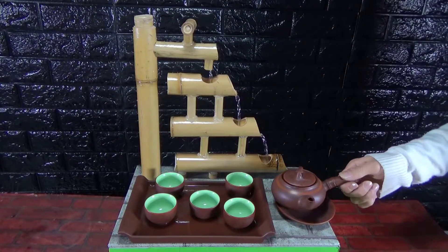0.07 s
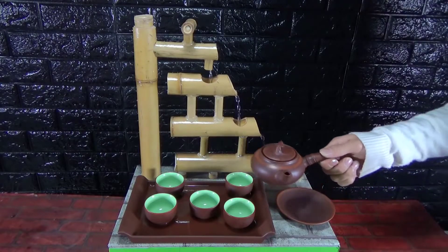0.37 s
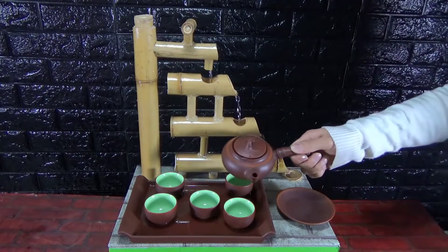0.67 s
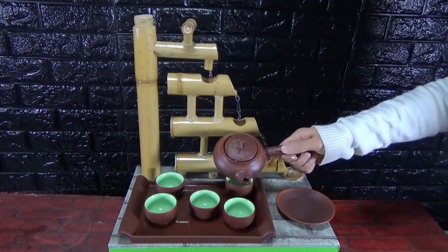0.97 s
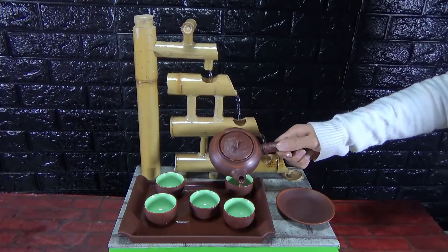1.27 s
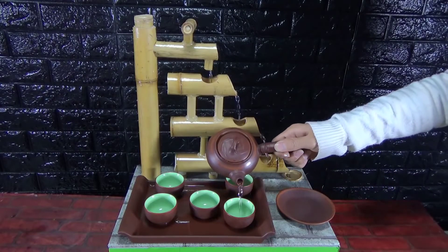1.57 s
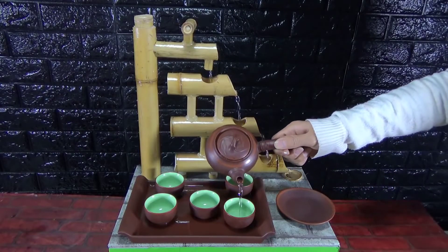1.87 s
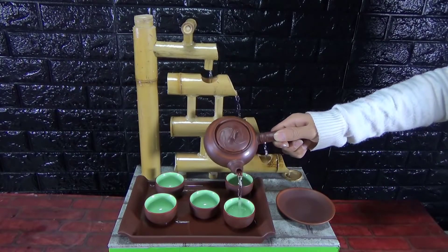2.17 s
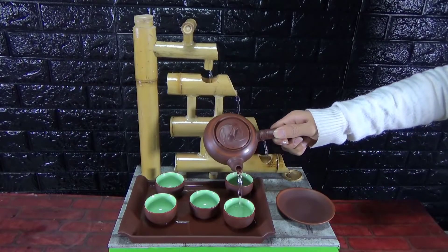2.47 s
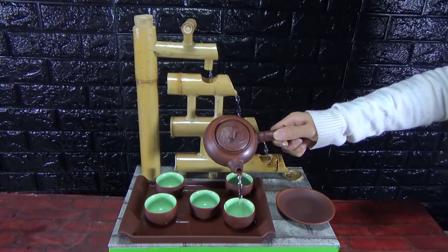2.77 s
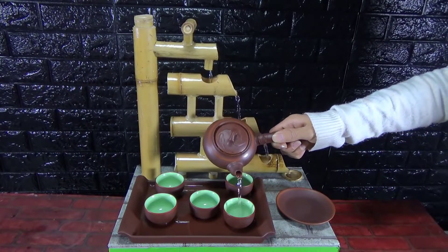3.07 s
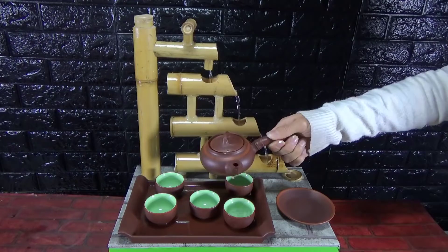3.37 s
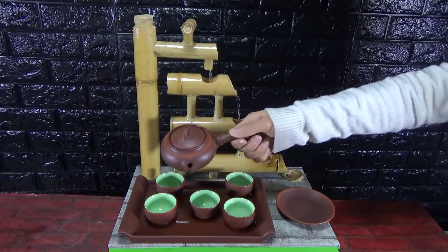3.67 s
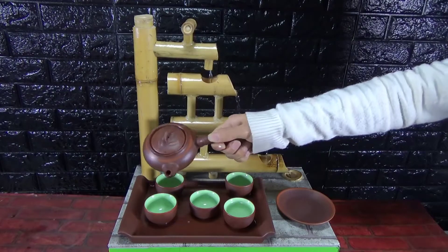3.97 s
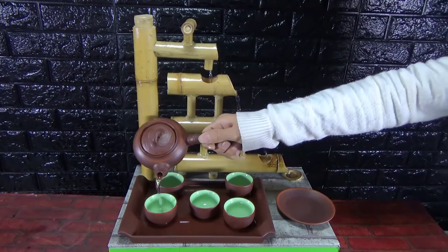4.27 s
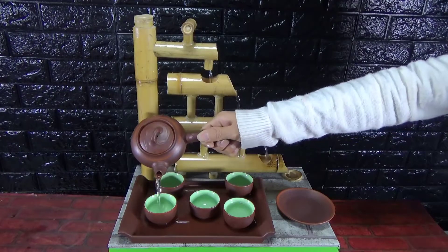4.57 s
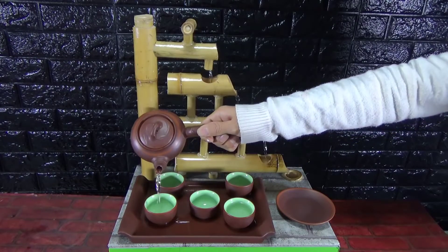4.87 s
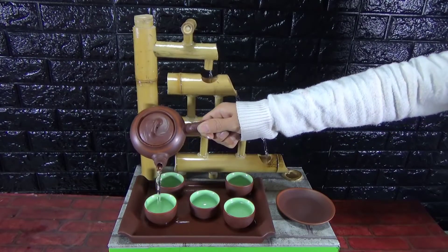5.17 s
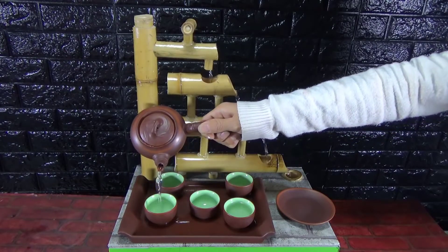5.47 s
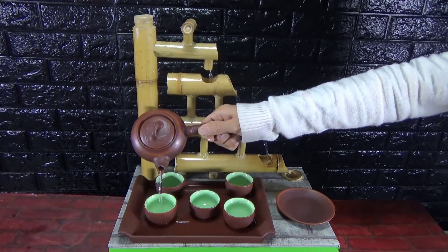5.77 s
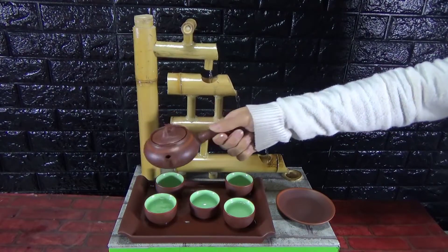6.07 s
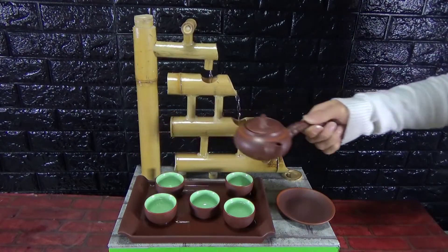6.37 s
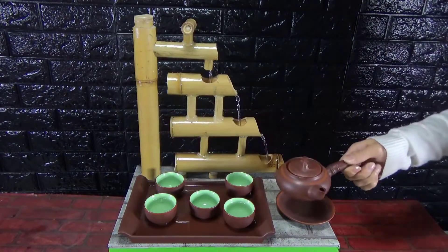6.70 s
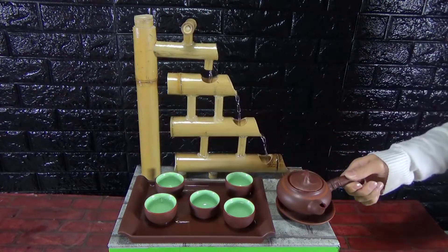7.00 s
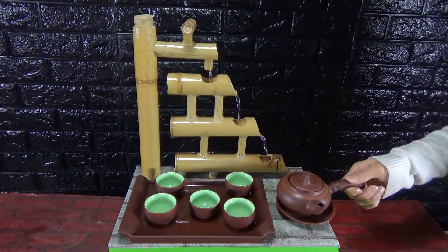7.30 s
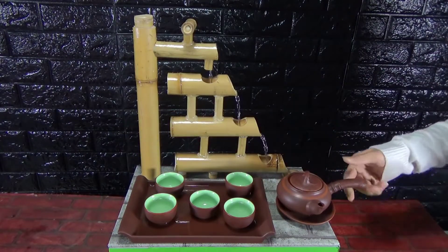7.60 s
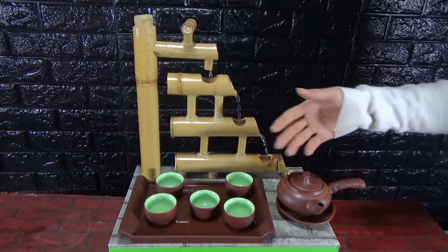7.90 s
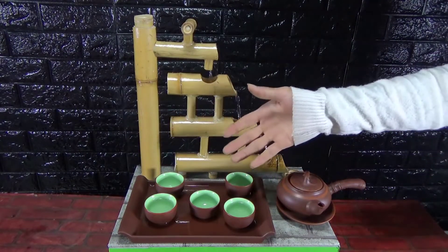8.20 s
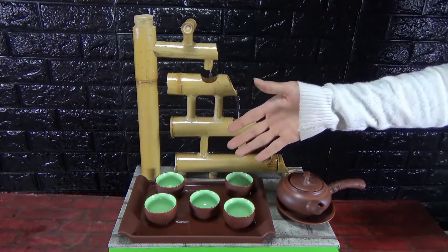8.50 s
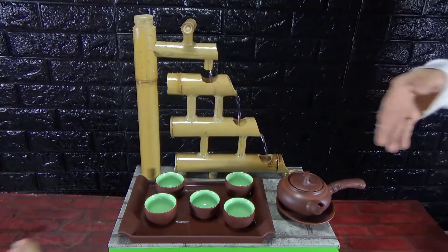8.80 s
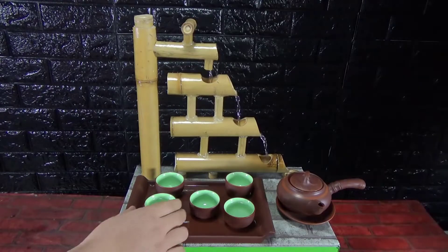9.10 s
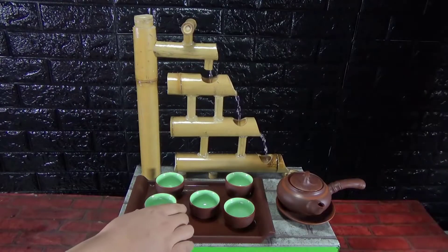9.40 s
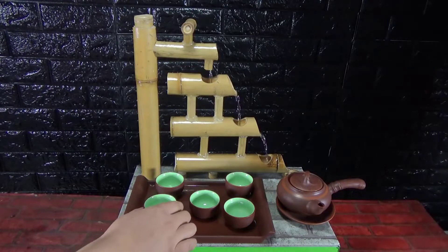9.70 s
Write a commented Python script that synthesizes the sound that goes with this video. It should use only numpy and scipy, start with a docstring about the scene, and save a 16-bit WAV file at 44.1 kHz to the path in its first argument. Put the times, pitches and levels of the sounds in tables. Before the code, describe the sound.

From the first moment to the end, about 10 seconds, a small bamboo fountain trickles close to the microphone in a quiet room. Drops fall in a quick, uneven patter. Some plink into shallow pools with short, bubbly notes that mostly rise in pitch, while others land on wet bamboo with crisp, high ticks. A few stand out slightly, for example at around 1.2 and 7.9 seconds, but the flow never swells or stops. Fine spray, a soft burble and a very faint hiss fill the tiny gaps between drops. The water sits near the centre, a little to the right, and the room adds a slight, short echo. Well below the water, an electric motor hums steadily with a quick throb, blending with faint low room noise.

```python
"""A small bamboo fountain trickles on a table in a quiet room, close to the microphone.
Water falls from spout to spout: big drops plink in the pools, each trapping a bubble that rings and
mostly rises in pitch. Others tick on the wet bamboo, and fine spray and soft burble fill the pauses.
The bamboo and the room throw the drops back, and an electric motor hums below with a quick throb."""
import sys
import numpy as np
from scipy import signal
from scipy.fft import rfft, irfft
from scipy.io import wavfile

SR = 44100
rng = np.random.default_rng(int(sys.argv[2]) if len(sys.argv) > 2 else 0)


def waveform_to_disk(signal):
    """Save audio, clipped to [-1, 1], as 16-bit WAV at the path in sys.argv[1]."""
    frames = np.transpose(np.atleast_2d(signal))
    scaled = np.clip(frames, -1, 1) * 32767
    samples = np.round(scaled).astype(np.int16)
    wavfile.write(sys.argv[1], SR, samples)


N = 434385
IMPACT_LEAD_S = 0.0005   # a drop strikes just before its bubble pinches off


# Drops plunging into the pools, close to the microphone. Each row: start in seconds, pitch in Hz,
# relative level in dB, ring length in cycles, glide as a pitch ratio (below 1 it falls).
POOL_DROPS = [(0.046, 2770, -29.5, 3.8, 0.92), (0.047, 877, -43.5, 5, 1.5), (0.057, 3660, -20.5, 0.91, 1.1),
              (0.065, 4130, -35, 5, 1.2), (0.138, 1164, -30.5, 4, 1.2), (0.236, 2040, -22, 4.1, 0.85),
              (0.246, 3100, -23.5, 2.5, 1.1), (0.283, 2570, -27.5, 3.1, 1), (0.372, 4430, -28, 7.3, 1.2),
              (0.454, 1300, -28.5, 9.3, 2), (0.471, 4970, -20.5, 15, 0.9), (0.516, 1350, -34.5, 7.5, 2),
              (0.565, 5200, -22, 8.5, 1.6), (0.683, 3130, -28, 13, 1.6), (0.706, 3500, -27, 3.6, 1.1),
              (0.719, 1440, -36.5, 4.5, 1.7), (0.75, 3700, -32, 6.1, 0.96), (0.776, 2370, -25.5, 2.1, 3.3),
              (0.804, 2900, -28.5, 11, 0.88), (0.837, 3100, -24.5, 10, 0.74),
              (1.005, 1650, -27.5, 3.9, 1.9), (1.032, 2270, -30, 11, 3.3), (1.05, 2680, -20.5, 1.2, 0.67),
              (1.108, 3320, -23.5, 12, 3), (1.209, 2055, -21, 12, 0.87), (1.2465, 2520, -16, 11, 1.1),
              (1.269, 2780, -29, 5.4, 1.4), (1.39, 2050, -30.5, 2.8, 0.86), (1.539, 1440, -29, 4.6, 1.8),
              (1.557, 2540, -28, 5, 2.9), (1.612, 2070, -26.5, 21, 4), (1.629, 3600, -24.5, 3.1, 1),
              (1.652, 2170, -22.5, 4.1, 0.92), (1.66, 1590, -30.5, 2.4, 1), (1.705, 2110, -31.5, 8.3, 2.2),
              (1.809, 3430, -29, 3.6, 1), (1.931, 1220, -26.5, 3.3, 1.1), (1.972, 3200, -32, 4.5, 1.3),
              (1.999, 3230, -24.5, 1.7, 0.81), (2.033, 2880, -27, 3.5, 1), (2.053, 1350, -26, 5.9, 3.1),
              (2.11, 2600, -27, 3.8, 0.76), (2.117, 2140, -29, 7.5, 2.3), (2.232, 2330, -34.5, 6, 1.9),
              (2.301, 2920, -23, 9.3, 1.8), (2.333, 3330, -36, 9, 2), (2.395, 980, -43.5, 7.6, 1.7),
              (2.411, 1640, -24.5, 6.4, 2.8), (2.411, 2350, -27, 8.2, 2), (2.445, 3420, -27.5, 5.5, 0.99),
              (2.507, 2700, -28.5, 3.8, 0.85), (2.595, 1990, -30, 4.8, 1.1), (2.691, 3170, -28, 4.5, 1),
              (2.7, 2560, -20, 1.7, 0.93), (2.727, 3270, -24.5, 6.2, 3.5), (2.736, 2690, -28, 15, 1.1),
              (2.793, 3520, -26, 12, 0.59), (2.793, 4080, -18.5, 1.9, 1.2), (2.834, 1440, -33, 2.2, 1),
              (2.842, 3550, -24, 2.6, 2.2), (3.019, 3360, -23, 8.6, 0.76), (3.022, 1950, -35, 8.6, 1.1),
              (3.055, 3650, -31, 4.5, 0.98), (3.1, 3440, -29, 4, 1.3), (3.233, 2770, -32.5, 12, 1.8),
              (3.263, 2080, -20.5, 11, 1.7), (3.28, 2420, -29, 7.6, 2.1), (3.377, 3760, -25.5, 3.5, 0.67),
              (3.421, 1960, -31, 2.8, 1), (3.425, 3750, -32, 6, 1.2), (3.439, 4220, -20, 2.1, 1),
              (3.44, 3440, -28, 10, 1), (3.458, 4360, -25, 8.4, 0.86), (3.471, 2090, -28, 9.7, 2.3),
              (3.472, 1250, -40, 8.6, 1.3), (3.513, 2760, -27, 5.6, 1.8), (3.609, 2290, -23, 1.4, 0.62),
              (3.621, 1580, -35.5, 11, 1.2), (3.664, 2160, -29, 2.6, 0.72), (3.67, 4370, -23.5, 12, 1.3),
              (3.732, 2450, -19.5, 0.99, 0.65), (3.832, 4600, -26, 3.5, 1.3), (3.848, 3940, -25, 3.7, 1.1),
              (3.861, 4380, -27, 8.2, 2.1), (3.864, 5000, -21, 14, 1.4), (3.918, 3120, -25, 7.9, 1.8),
              (3.988, 3050, -33.5, 26, 1.1), (4.021, 1464, -31.5, 8.6, 0.73), (4.029, 2920, -32, 4.5, 1.5),
              (4.039, 1500, -34.5, 8.6, 3), (4.123, 1510, -33.5, 3, 1), (4.163, 2680, -28, 9.4, 1.9),
              (4.187, 2680, -33.5, 16, 1.1), (4.19, 1860, -34, 8.9, 2.3), (4.235, 2260, -30.5, 6.9, 1.6),
              (4.262, 830, -40, 6.4, 2.1), (4.319, 1830, -26, 4.2, 1), (4.376, 2800, -29.5, 15, 2.7),
              (4.405, 3100, -28, 10, 1.9), (4.416, 2040, -32.5, 11, 1.7), (4.429, 4330, -22.5, 2, 1.3),
              (4.533, 4570, -20.5, 5, 0.88), (4.544, 2340, -34.5, 9, 1.1), (4.564, 3190, -26.0, 6.1, 0.68),
              (4.571, 1760, -21, 3.5, 1.2), (4.607, 3740, -24, 4.3, 2.7), (4.635, 740, -40.5, 2.3, 0.81),
              (4.649, 3700, -33, 17, 1), (4.709, 1510, -28.5, 4.5, 1), (4.759, 2120, -28, 11, 0.91),
              (4.764, 3950, -21, 1.6, 1.1), (4.801, 1260, -32.0, 6, 3), (4.885, 2570, -32.5, 21, 1.7),
              (5.019, 2250, -19, 9.4, 1.35), (5.019, 4440, -32, 2.4, 1), (5.084, 2900, -31.5, 21, 2),
              (5.084, 3600, -23, 1.4, 0.72), (5.102, 4300, -26.5, 4.1, 1.6), (5.155, 2700, -30.5, 14, 2.1),
              (5.193, 2490, -25.5, 2, 1.1), (5.222, 2270, -26.5, 4.3, 0.74), (5.222, 4210, -19.5, 1.6, 1.2),
              (5.254, 3650, -29, 2.9, 1.1), (5.392, 2000, -33, 17, 1.2), (5.399, 3550, -34, 4.4, 0.9),
              (5.415, 2470, -20, 1.5, 0.59), (5.458, 3610, -25, 7, 1.3), (5.553, 2630, -28, 12, 1),
              (5.565, 2640, -28.5, 9, 2.1), (5.627, 2430, -30, 3.9, 0.99), (5.658, 2150, -28.5, 16, 1),
              (5.675, 2870, -21, 10.5, 1.7), (5.746, 2100, -30, 7.7, 1.2), (5.756, 3720, -25, 1.6, 1.7),
              (5.831, 4700, -22, 16, 1.5), (5.841, 2630, -27, 2.3, 0.65), (5.977, 2860, -30.5, 6.4, 1.3),
              (5.98, 2070, -34, 5.1, 1), (6.114, 2500, -37, 5, 1.3), (6.132, 2900, -26.5, 11, 1.4),
              (6.173, 4000, -24.5, 3.2, 1.6), (6.197, 2500, -27.5, 8.2, 2), (6.228, 2680, -29, 2.2, 1.2),
              (6.276, 1410, -39, 5.2, 1.1), (6.355, 2020, -37, 16, 1), (6.409, 2920, -31, 4.9, 1.6),
              (6.458, 2310, -27.5, 9.5, 3), (6.474, 1570, -27, 4.8, 0.7), (6.554, 4480, -29, 6.4, 0.94),
              (6.589, 1910, -30.5, 7.5, 0.88), (6.597, 3090, -30.5, 12, 1.5),
              (6.609, 1130, -33.5, 8.6, 2.8), (6.61, 2260, -25, 1.1, 1), (6.637, 2860, -26, 5.4, 1.1),
              (6.638, 1570, -25.5, 2.5, 2.7), (6.661, 2140, -27, 9.6, 0.92)]

def plinks(level_db=2.27):
    """Drops into the pools: a bright click, then a big trapped bubble that rings and glides."""
    rows = with_repeat(POOL_DROPS)
    return from_db(level_db) * drops(rows, impact_db=-2, splash_db=-5.5, splash_s=0.0021, low_hz=2200)


# Drops landing on the wet bamboo, just as close.
# Each row: start in seconds, relative level in dB, pitch in Hz.
BAMBOO_DROPS = [(0.023, -19, 10000), (0.063, -27, 9800), (0.098, -9.5, 8300), (0.115, -18.5, 9300),
                (0.172, -20, 9050), (0.211, -20, 5340), (0.255, -19, 8400), (0.363, -17.5, 9200),
                (0.382, -10.5, 8100), (0.394, -15.5, 11000), (0.463, -23, 7500), (0.471, -18, 9000),
                (0.481, -20.0, 11000), (0.515, -16, 5170), (0.591, -17.5, 6450), (0.727, -15, 8900),
                (0.737, -17.5, 9500), (0.758, -22, 9300), (0.777, -13.5, 8200), (0.803, -16, 9000),
                (0.825, -19, 11700), (0.837, -21, 5900), (0.851, -17, 8200), (0.932, -15, 8650),
                (0.941, -24, 8700), (0.963, -16.5, 5340), (1.021, -20.5, 5800), (1.046, -12.5, 8840),
                (1.05, -23, 6760), (1.063, -24, 9000), (1.107, -18, 8260), (1.178, -15.5, 5500),
                (1.193, -17.5, 9000), (1.209, -23, 5860), (1.229, -14, 5300), (1.234, -26, 5800),
                (1.26, -20, 12800), (1.272, -22, 6900), (1.318, -7, 7830), (1.327, -20, 5600),
                (1.333, -22.0, 9600), (1.364, -13.5, 10600), (1.382, -21.5, 5300), (1.439, -13, 5740),
                (1.525, -19, 7500), (1.557, -22, 10100), (1.601, -21, 6330), (1.626, -13.5, 9200),
                (1.63, -13, 8300), (1.661, -25, 10800), (1.682, -22, 8960), (1.71, -19.5, 9050),
                (1.752, -18.5, 8950), (1.773, -21, 7900), (1.802, -18.5, 8900), (1.81, -19.5, 5140),
                (1.863, -29, 5860), (1.934, -13, 6660), (1.946, -16, 5560), (1.958, -17.5, 10300),
                (2.033, -14.5, 12600), (2.086, -18, 4700), (2.174, -15.5, 11700), (2.179, -14.5, 7000),
                (2.273, -21, 9200), (2.301, -24, 9200), (2.343, -20, 8500), (2.369, -27, 8400),
                (2.39, -12.5, 8900), (2.492, -23.5, 8800), (2.53, -13.5, 5840), (2.545, -15.5, 9600),
                (2.573, -21.5, 9000), (2.587, -17.5, 5900), (2.613, -20.0, 11200), (2.631, -24, 8800),
                (2.646, -20.5, 9200), (2.701, -16.5, 8260), (2.743, -17, 8600), (2.87, -10, 8830),
                (2.989, -13.5, 6500), (2.996, -17.5, 10700), (3.06, -18.5, 6300), (3.143, -18.0, 8500),
                (3.152, -18.5, 5200), (3.157, -13.5, 7200), (3.188, -16, 9900), (3.261, -29, 5670),
                (3.355, -12, 6800), (3.393, -23, 8900), (3.439, -20.5, 9000), (3.452, -19, 8700),
                (3.458, -19, 11100), (3.47, -14, 9300), (3.499, -18.0, 8950), (3.529, -19, 6500),
                (3.557, -22, 6360), (3.588, -19.5, 5550), (3.609, -23, 9600), (3.645, -18.5, 8900),
                (3.669, -21.5, 8160), (3.693, -23, 8600), (3.713, -19.0, 8400), (3.738, -20, 11700),
                (3.795, -17, 5540), (3.798, -18.5, 8950), (3.863, -17, 8750), (3.871, -15.5, 8900),
                (3.918, -23, 10200), (3.933, -14, 10600), (3.956, -22, 5900), (4.076, -11.5, 5650),
                (4.103, -13.0, 8800), (4.138, -15.5, 8300), (4.142, -15.5, 10700), (4.152, -15.5, 5100),
                (4.166, -21.5, 10100), (4.188, -23, 8950), (4.218, -18, 9200), (4.258, -17.5, 9700),
                (4.263, -12.5, 7200), (4.416, -19.0, 6350), (4.457, -17, 8750), (4.475, -11.5, 7900),
                (4.534, -20, 10000), (4.563, -28, 9000), (4.574, -21.5, 9100), (4.608, -19.5, 9000),
                (4.764, -17.5, 6100), (4.817, -17.5, 7600), (4.857, -16.5, 5550), (4.879, -19.5, 8700),
                (4.946, -14, 9000), (5.007, -19.5, 9000), (5.073, -21.0, 9000), (5.084, -27, 5100),
                (5.094, -20, 5500), (5.137, -15.0, 8400), (5.151, -11, 8700), (5.156, -14, 10500),
                (5.169, -17, 5170), (5.187, -22, 8200), (5.193, -23, 6800), (5.34, -20, 5800),
                (5.345, -18.0, 8200), (5.365, -18, 5870), (5.37, -17, 8500), (5.388, -13, 9600),
                (5.414, -17.5, 8600), (5.423, -20.0, 5640), (5.453, -20, 9150), (5.481, -17.0, 5700),
                (5.485, -23, 8300), (5.618, -21.5, 10200), (5.658, -16.5, 9900), (5.701, -12.5, 10300),
                (5.745, -15, 10700), (5.815, -10, 5760), (5.841, -21.5, 8600), (5.861, -17, 9500),
                (5.872, -14.5, 6000), (5.996, -18.5, 9900), (6.04, -13.0, 9100), (6.062, -19, 4970),
                (6.088, -21.5, 9000), (6.095, -15, 9500), (6.152, -19, 10900), (6.332, -12.5, 6400),
                (6.354, -13.5, 5950), (6.457, -13.5, 6400), (6.465, -19, 6300), (6.492, -15.0, 6500),
                (6.514, -12, 8400), (6.638, -12.5, 8600)]

def ticks(level_db=-1.0, ring_s=0.0005):
    """Drops onto wet bamboo: a bright smack and a tiny bubble that bursts almost at once."""
    rows = [(start, hz, db, ring_s * hz, 1) for start, db, hz in with_repeat(BAMBOO_DROPS)]
    return from_db(level_db) * drops(rows, impact_db=5.5, splash_db=-10, splash_s=0.0018, low_hz=7780)


def with_repeat(rows, period_s=6.67678):
    """The pattern of drops comes round again one period later."""
    rows = np.array(rows, float)
    again = np.column_stack([rows[:, 0] + period_s, rows[:, 1:]])
    return np.vstack([rows, again[again[:, 0] < N / SR]])


def drops(rows, impact_db, splash_db, splash_s, low_hz, high_hz=11300):
    """Each drop clicks on impact, then its bubble rings over a short spatter."""
    rings, splashes = np.zeros((2, 2, N))
    for start, hz, db, cycles, rise in rows:
        # big bubbles form further to the right, in the deeper water
        pan = from_db(0.5 * np.sqrt(1000 / hz) * np.array([[-1], [1]]))
        add(rings, start, pan * from_db(db) * basin_scatter(bubble(hz, cycles, rise)))
        add(splashes, start - IMPACT_LEAD_S, from_db(db + impact_db) * basin_scatter(np.ones(1)))
        add(splashes, start, from_db(db + splash_db) * spatter(splash_s))
    band = signal.butter(2, [low_hz, high_hz], "band", fs=SR, output="sos")
    return rings + signal.sosfilt(band, splashes)


def bubble(hz, cycles, rise, attack_cycles=0.62, neck_cycles=0.9, surface_age=2.7):
    """Trapped air rings as a damped sine; nearing the surface, its pitch glides and it is cut short."""
    turns = np.arange(int(5 * cycles / hz * SR) + 8) * hz / SR
    age = turns / cycles   # in ring lengths
    envelope = np.exp(-age - (age / surface_age) ** 2) * (1 - np.exp(-turns / attack_cycles))
    neck = 0.2 * np.exp(-turns / neck_cycles)   # the pitch starts sharp and settles as the neck closes
    glide = 1 + neck + (rise - 1) * np.tanh((age / 3) ** 2)
    return envelope / envelope.max() * np.sin(2 * np.pi * hz / SR * np.cumsum(glide))


def spatter(decay_s, spread_db=7, size=900):
    """The torn surface throws a dying scatter of tiny clicks of very uneven size."""
    grains = from_db(spread_db * np.minimum(rng.standard_normal(size), 2.5))
    return burst(decay_s, size) * grains / np.sqrt(np.mean(grains ** 2))


def basin_scatter(sound, echo_db=-30, decay_s=0.0034, gap_samples=30):
    """Bamboo and basin scatter a drop's sound, differently for every landing place."""
    paths = np.pad(from_db(echo_db) * burst(decay_s), ((0, 0), (gap_samples, 0)))
    paths[:, 0] = from_db(0.31 * rng.standard_normal() * np.array([1, -1]))   # the direct path
    return signal.fftconvolve(sound[None], paths, axes=1)


# Faint spray around the spouts, from large bubbles to small.
# Each row: pitch in Hz, typical relative level in dB.
SPRAY_BUBBLES = [(1700, -42), (2600, -37.5), (4200, -32), (7000, -31), (9200, -23.5), (13000, -41)]

def spray(count=1500, spread_db=4, follow_share=0.36, lag_s=0.0059, cycles=2.8, rise=1.3):
    """Tiny droplets click and plink; some come at random, others fall back just after a bigger drop."""
    out = np.zeros(N)
    chance, scatter = rng.random((count, 4)), rng.standard_normal((count, 2))
    drop_times = np.sort(np.r_[with_repeat(POOL_DROPS)[:, 0], with_repeat(BAMBOO_DROPS)[:, 0]])
    click = from_db(-1) * np.array([1, 1, -1, -1]) / 2
    low_hz, high_hz = SPRAY_BUBBLES[0][0], SPRAY_BUBBLES[-1][0]
    for (when, kind, lag, size), (force, ring) in zip(chance, scatter):
        hz = low_hz * (high_hz / low_hz) ** np.sqrt(size)   # small bubbles are the more common
        height = from_db(at_hz(SPRAY_BUBBLES, hz) + spread_db * min(force, 1.5))
        if kind < follow_share:
            start = drop_times[int(when * len(drop_times))] - lag_s * np.log(1 - lag)
        else:
            start = when * N / SR
        add(out, start - IMPACT_LEAD_S, height * click)
        add(out, start, height * bubble(hz, cycles * np.exp(np.tanh(ring)), rise))
    # such small sources radiate little bass
    return signal.sosfilt(signal.butter(2, 1600, "high", fs=SR, output="sos"), out)


def burble(level_db=-48, spread_db=4, low_hz=1150, high_hz=5800, cycles=6, rise=1.4, count=2600):
    """Running water stirs up soft bubbles of many sizes, which merge into a quiet burble."""
    out = np.zeros(N)
    for when, size, force, ring in rng.random((count, 4)):
        hz = low_hz * (high_hz / low_hz) ** np.sqrt(size)
        height = from_db(level_db + spread_db * (2 * force - 0.5))
        add(out, when * N / SR, height * bubble(hz, cycles * (0.5 + ring), rise))
    return out


# The room's tail, as it comes back to the table. Each row: frequency in Hz, relative level in dB.
TAIL_SPECTRUM = [(300, -4), (850, 24), (1400, 19), (2400, 19), (4200, 13), (9000, 15), (16000, -5)]

def room_tail(water, level_db=-18, delay_s=0.006, t60_s=0.33):
    """The room returns the water as dense reflections that begin after a delay and die away."""
    t = np.arange(SR // 2) / SR
    tail = coloured(TAIL_SPECTRUM, len(t), likeness=0.68) * from_db(-60 * t / t60_s)
    tail /= np.sqrt(np.sum(tail ** 2) / 2)
    tail = np.pad(tail, ((0, 0), (round(delay_s * SR), 0)))
    return from_db(level_db) * signal.fftconvolve(water.mean(axis=0)[None], tail, axes=1)[:, :N]


# The finest splashes, further from the microphone. Each row: frequency in Hz, relative level in dB.
WASH_SPECTRUM = [(100, -19), (450, -6.5), (800, -3), (2600, -7.5), (4200, -15.5), (7400, -13.5), (9000, -6),
                 (11500, -38), (16500, -53)]

def wash(level_db=-55):
    """The finest splashes blur into a steady hiss."""
    return from_db(level_db) * coloured(WASH_SPECTRUM, N, likeness=0.69)


# The motor's hum, below the water.
# Each row: multiple of the mains frequency, multiple of the rotor rate, rms level in dB.
HUM_LINES = [(0, 2, -66), (0, 3, -63.5), (0, 5, -54), (2, 0, -61.5), (3, 0, -64.5), (4, 0, -66.5),
             (5, 0, -72), (6, -1, -61), (6, 0, -60), (6, 1, -57), (6, 2, -61), (8, 0, -72.5), (9, 0, -73.5),
             (10, 0, -73)]
# Two splices: at each cut the hum's throb jumps in time.
# Each row: time in seconds, time offset in seconds.
SPLICE_OFFSETS = [(3.4, .0306), (3.44, .0467), (4.78, .0467), (4.82, .0578)]

def motor(mains_hz=50.225, rotor_hz=24.96):
    """Mains and rotor tones; each turn of the rotor swells the buzz near 300 Hz, so the hum throbs."""
    t = np.arange(N) / SR
    rotor_turns = rotor_hz * (t - np.interp(t, *np.transpose(SPLICE_OFFSETS)))
    hum = np.zeros(N)
    for mains, rotor, db in HUM_LINES:
        turns = mains * mains_hz * t + rotor * rotor_turns
        hum += np.sqrt(2) * from_db(db) * np.cos(2 * np.pi * turns)
    return hum


# The quiet room all around the microphone. Each row: frequency in Hz, relative level in dB.
ROOM_TONE_SPECTRUM = [(15, -24), (30, -4), (70, -25), (105, -10), (145, 0), (190, -5.5), (235, -3.5),
                      (330, -7.5), (700, -19), (3000, -23)]

def room_tone(level_db=-55):
    """Low, steady room noise, almost the same left and right."""
    return from_db(level_db) * coloured(ROOM_TONE_SPECTRUM, N, likeness=0.995)


def coloured(spectrum, size, likeness):
    """Stereo noise of rms 1 with this spectrum and a left-right likeness from 0 to 1."""
    gains = from_db(at_hz(spectrum, np.arange(size // 2 + 1) * SR / size))
    mid, side = irfft(rfft(rng.standard_normal((2, size))) * gains, size)
    noise = np.sqrt(1 + likeness) * mid + np.sqrt(1 - likeness) * side * [[1], [-1]]
    return noise / noise.std()


def burst(decay_s, size=640):
    """Noise that dies at once, nearly alike in both channels."""
    mid, side = rng.standard_normal((2, size)) * np.exp(-np.arange(size) / (decay_s * SR))
    return mid + 0.14 * side * [[1], [-1]]


def from_db(db):
    """Decibels to gain."""
    return 10 ** (np.asarray(db) / 20)


def at_hz(spectrum, hz):
    """Read a spectrum on a log-frequency axis."""
    freqs, levels = np.transpose(spectrum)
    return np.interp(np.log(np.maximum(hz, 1)), np.log(freqs), levels)


def add(track, start_s, sound):
    """Mix a short sound into a track."""
    at = max(round(start_s * SR), 0)
    part = track[..., at:at + sound.shape[-1]]
    part += sound[..., :part.shape[-1]]


def scene(right_db=0.52, air_hz=11000):
    """Close water a little to the right of the microphone, its room tail, the motor and room tone."""
    water = plinks() + ticks() + spray() + burble()
    air = signal.butter(4, air_hz, fs=SR, output="sos")   # far and reflected sound loses its top
    far = signal.sosfilt(air, room_tail(water) + wash())
    pan = from_db([[-right_db], [right_db]])
    return (water + far) * pan + motor() + room_tone()


def record(dry, ceiling=0.32, cutoff_hz=16200):
    """The recorder rounds off the sharpest peaks, and the top is cut steeply."""
    rounded = dry / (1 + (dry / ceiling) ** 4) ** (1 / 4)
    return signal.sosfilt(signal.ellip(10, 0.2, 80, cutoff_hz, fs=SR, output="sos"), rounded)


dry = scene()
out = record(dry)
waveform_to_disk(out)
```